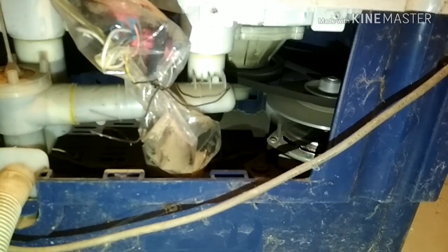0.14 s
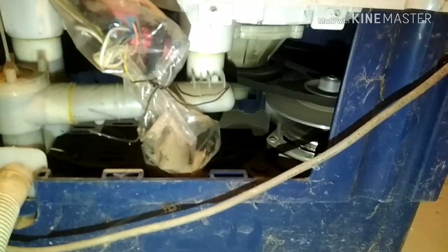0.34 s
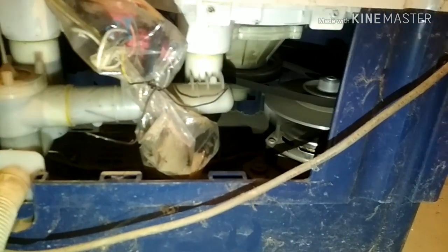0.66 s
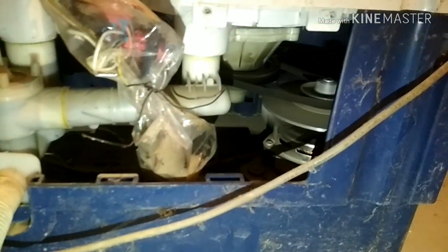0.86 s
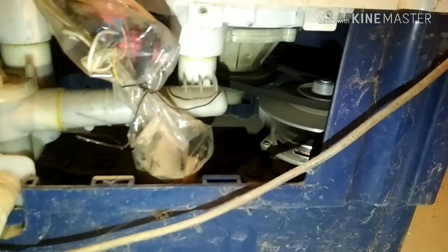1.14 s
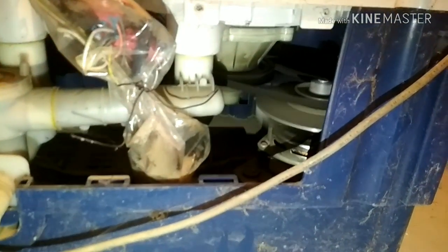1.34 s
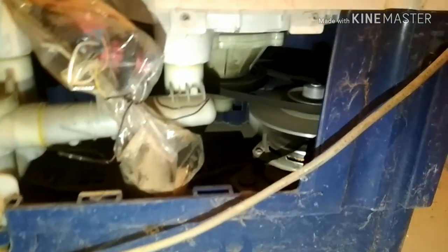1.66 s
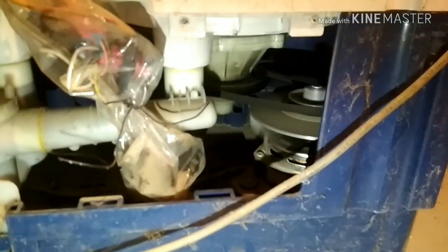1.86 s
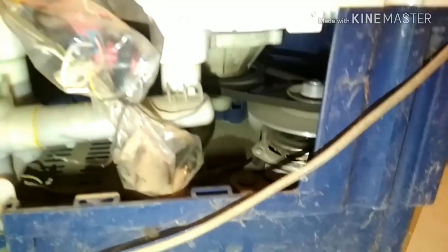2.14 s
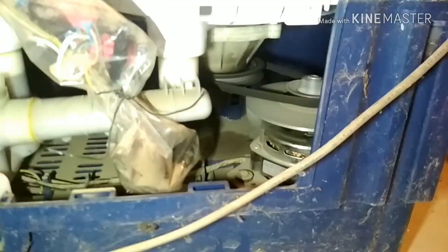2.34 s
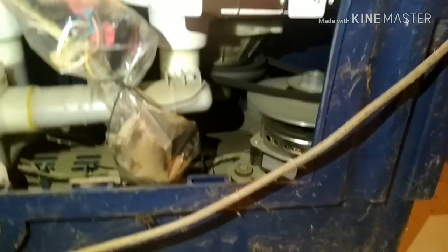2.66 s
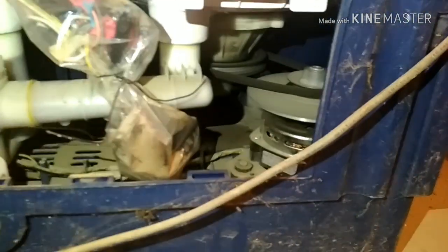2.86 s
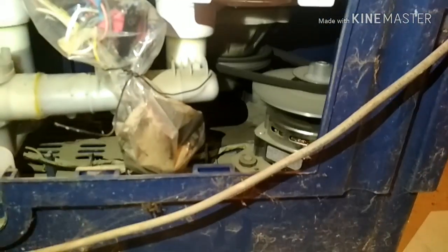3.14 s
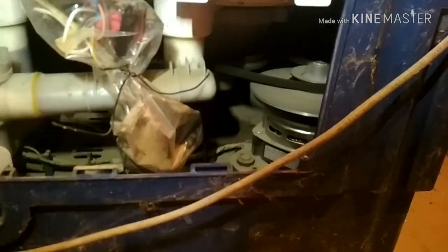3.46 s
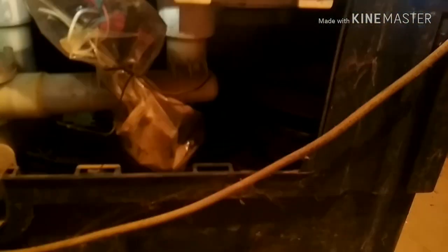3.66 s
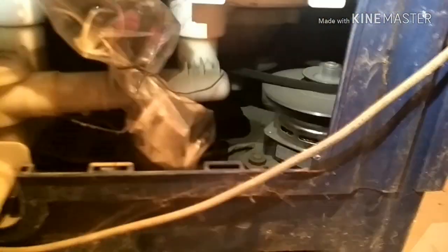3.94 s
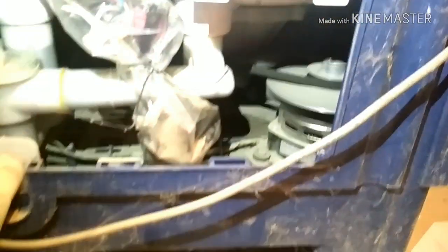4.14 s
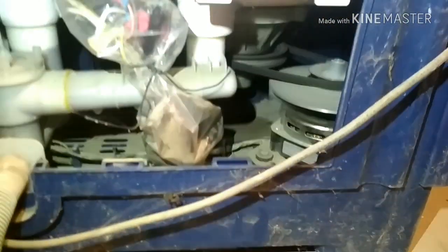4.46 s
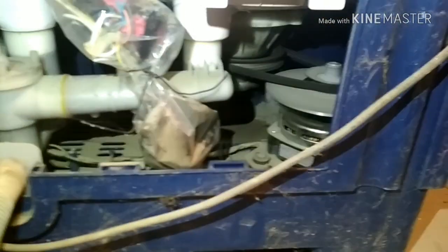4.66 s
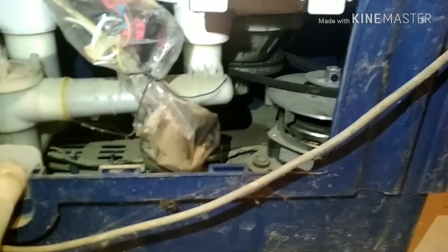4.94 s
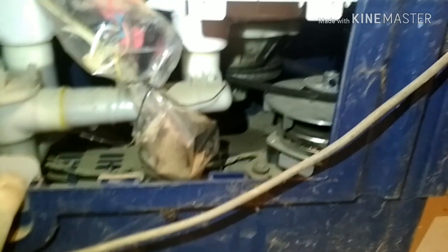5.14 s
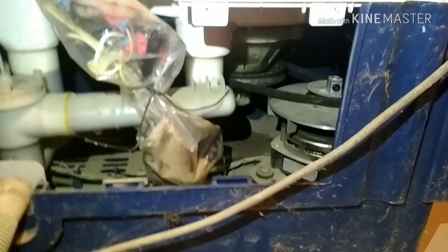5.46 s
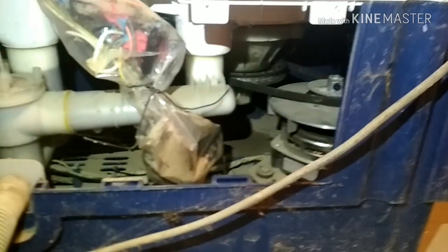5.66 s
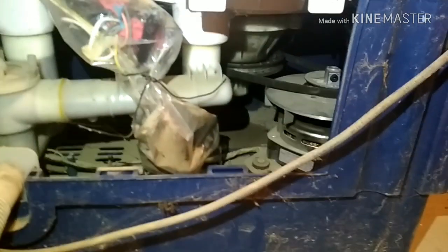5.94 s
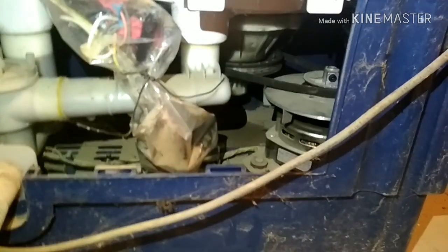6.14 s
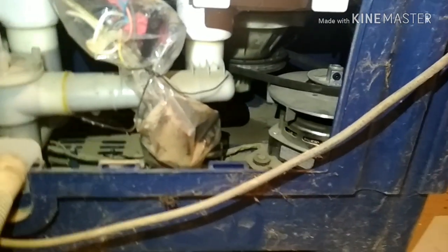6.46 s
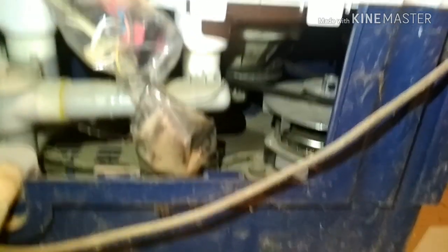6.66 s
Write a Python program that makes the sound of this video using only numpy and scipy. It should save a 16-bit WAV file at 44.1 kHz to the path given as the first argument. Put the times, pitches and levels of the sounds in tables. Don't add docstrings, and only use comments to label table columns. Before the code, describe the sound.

Close to an open washing machine, a strong low mains hum shakes the cabinet, with grinding gears, a hissing fan and a belt squeaking about twice a second. A plastic bag rustles and snaps early on. The power cuts halfway; the whirr slows and fades within about a second. Quiet follows, with nail ticks, finger creaks on the phone case, mostly left, and a faint distant engine.

```python
import sys
import numpy as np
from scipy import signal
from scipy.fft import rfft, irfft, next_fast_len
from scipy.io import wavfile
from scipy.ndimage import uniform_filter1d, map_coordinates

SR = 44100
rng = np.random.default_rng(int(sys.argv[2]) if len(sys.argv) > 2 else 0)


def digitize_waveform(pressure):
    field = np.atleast_2d(pressure).T
    bounded = np.clip(field, -1, 1)
    quanta = np.round(bounded * 32767).astype(np.int16)
    wavfile.write(sys.argv[1], SR, quanta)


def to_linear_factor(level_db):
    exponent = np.asarray(level_db, float) / 20
    return 10 ** exponent


N = 300320

# time in seconds, level in dB.
HUM_LEVEL = [(0.0, -8.5), (0.23, -12), (0.39, -15), (0.55, -11), (0.81, -14.5), (1.26, -9), (1.83, -14),
             (2.04, -11.5), (2.15, -14), (2.29, -12), (2.47, -16.5), (2.59, -17), (2.63, -13), (2.93, -11),
             (2.98, -9), (3.14, -10), (3.57, -9.5)]
# multiple of the hum, left level in dB, right level in dB.
IRON_BUZZ = [(2, -29.5, -33), (3, -37.5, -37), (4, -42, -40), (5, -43.5, -43.5), (6, -52, -47),
             (7, -47.5, -57.5), (8, -55.5, -53), (9, -49.5, -51), (10, -57.5, -51), (11, -52.5, -49)]
# pitch in Hz, width in Hz, level in dB.
CABINET_MODES = [(85.2, 9.9, -1), (115.7, 9, -3), (128.8, 14, -2.5), (169, 34, -9), (55.6, 40, -24),
                 (223, 79, -19.5)]
# pitch in Hz, width in Hz, level in dB.
FRAME_MODES = [(223, 40, -20.5), (269.4, 9, 0.5), (344, 47, -7.5), (371, 30, -5), (416.2, 31, -9.5),
               (506.4, 63.5, -12.5), (725, 286, -18)]
# pitch in Hz, width in Hz, level in dB.
PULLEY_MODES = [(826, 293, -3), (1190, 243, 0.5), (1409, 150, 2.5), (1585, 168, 0), (2190, 660, -10.5)]
# pitch in Hz, width in Hz, level in dB.
BEARING_MODES = [(1430, 130, 0), (1230, 70, 0)]
# start in seconds, length in seconds, level in dB.
BEARING_SPELLS = [
    (4.25, .12, -71),
    (4.552, 0.5, -71.5),
]
# frequency in Hz, level in dB per Hz.
FAN_COLOUR = [(1500, -34.5), (2500, -1), (3500, -6.5), (4500, -11.5), (6000, -2), (9000, -6), (11200, -1.5),
              (13000, -14.5), (15300, -31)]
# start in seconds, length in seconds, dB over the fan.
BAG_FLUTTER = [(0.02, 1.0, -3), (3.12, 0.31, -8)]
# time in seconds, share of full speed.
ROTOR_SPEED = [(3.6, 1), (3.75, 0.83), (3.85, 0.84), (4.0, .72), (4.24, 0.61), (4.32, 0.51), (4.45, 0.46),
               (4.55, 0.28), (4.75, .13), (4.9, .02)]

# time in seconds, peak in dB, left-right difference in dB.
BAG_FOLDS = [(0.0844, -30.5, -0.5), (0.1499, -39.5, -5.5), (0.2696, -24.5, -5), (0.2867, -38.5, -7.5),
             (0.4657, -39, -11.5), (0.6376, -42, -9), (0.7189, -45, -2.5), (0.8312, -30.5, -3.5),
             (3.2387, -43.5, 2.5), (3.4278, -36.5, -4)]
# time in seconds, peak in dB, left-right difference in dB.
BAG_SNAPS = [
    (0.502, -43, -2),
    (0.9266, -20, -0.5),
    (3.1328, -41, -2.5),
]
# time in seconds, peak in dB, left-right difference in dB.
BAG_SLIDES = [(4.2394, -45.5, -9.5), (5.675, -51, 14), (5.697, -40, 16.5)]
# time in seconds, peak in dB, left-right difference in dB.
NAIL_TICKS = [(4.9962, -37.5, 6.5)]
# time in seconds, peak in dB, left-right difference in dB.
NAIL_TAPS = [(4.5878, -61.5, 10), (4.5915, -60, -5), (4.8634, -58.5, 9)]
# frequency in Hz, level in dB per Hz.
FILM_BRIGHT = [(4500, -30.5), (6500, -13), (8500, -2), (11000, 0), (13500, -6.5), (15500, -14.5)]
# frequency in Hz, level in dB per Hz.
FILM_DULL = [(900, -21.5), (1900, 2), (3000, 1.5), (4600, -0.5), (6500, -3.5), (9000, -33)]

# time in seconds, peak in dB, case pitch in Hz, left-right difference in dB.
FINGER_SLIPS = [(4.592, -53, 880, 12), (4.863, -48, 1270, 23.5), (4.995, -51, 1300, 20),
                (5.01, -53, 910, 12), (5.024, -56, 719, 16), (5.045, -59, 610, 22), (5.068, -51.5, 835, 16),
                (5.098, -57, 634, 17), (5.14, -59, 350, 14), (5.181, -58, 812, 12.5),
                (5.198, -57.5, 1000, 17), (5.227, -67, 816, 9), (5.247, -55.5, 682, 25),
                (5.349, -61, 690, 16), (5.387, -61, 390, 17), (5.417, -64, 397, 21), (5.44, -68, 390, 18),
                (5.458, -62, 383, 23), (5.495, -67.5, 370, 18), (5.514, -69, 370, 18),
                (5.534, -66, 406, 19), (5.554, -57, 1640, 12.5), (5.618, -60, 385, 10),
                (5.788, -66.5, 1230, 0.5), (5.936, -61, 1400, -8), (6.014, -59.5, 1400, -4.5),
                (6.106, -67, 404, 14.5), (6.173, -59, 557, 23), (6.305, -56, 1230, 4.5),
                (6.524, -62.5, 1650, 5.5)]
# start in seconds, length in seconds, tremor in dB, scrape in dB.
HAND_TOUCHES = [(4.863, 0.02, -50.5, -65), (4.999, 0.097, -53, -57.5), (5.139, 0.13, -59.5, -66.5),
                (5.304, 0.11, -64.5, -77), (5.423, 0.11, -67, -81), (5.756, .03, -70, -90.5),
                (6.125, .05, -67, -74), (6.177, .03, -85, -68), (6.497, 0.089, -75, -80)]
# frequency in Hz, level in dB per Hz.
TREMOR_COLOUR = [(25, -8), (70, 3), (110, 8), (170, 6.5), (220, -5.5), (300, -21), (500, -46.5)]
# pitch in Hz, width in Hz, level in dB.
CASE_MODES = [(387, 43, -4), (634, 140, -1.5), (890, 370, -2.5)]

# time in seconds, firings per second.
ENGINE_PACE = [(0.0, 26.08), (0.5, 28.58), (1.7, 28.48), (2.2, 30.39), (2.7, 28.25), (3.3, 30.16),
               (3.6, 24.54), (4.0, 26.06), (4.45, 22.86), (5.1, 27.05), (5.55, 24.59), (6.2, 28.17),
               (6.81, 26.33)]
# time in seconds, level in dB.
ENGINE_LEVEL = [(3.6, -61.5), (4.51, -65.5), (4.73, -65), (5.2, -63), (5.48, -66.5), (6.08, -64),
                (6.46, -67), (6.81, -63.5)]
# frequency in Hz, level in dB per Hz.
ENGINE_COLOUR = [(600, -30), (1200, -3), (1600, -4), (2900, 0), (5200, -1), (7500, 0.5), (11400, -2.5),
                 (13000, -7.5), (14500, -15.5), (15400, -18)]
# frequency in Hz, level in dB per Hz.
ROOM_COLOUR = [(120, -28), (200, -8), (997, -12), (1370, -8), (1520, -8), (1640, -6), (2500, -6),
               (3250, -28.5), (5500, -120)]
# pitch in Hz, width in Hz, level in dB.
WALL_MODES = [(100, 9, 0), (46.06, 30, -7)]
# time in seconds, level in dB.
HOUSE_LEVEL = [(5.6, -76.5), (5.8, -68.5), (6.0, -74.5), (6.13, -63.5), (6.81, -68)]

# frequency in Hz, likeness from 0 to 1.
EAR_LIKENESS = [(60, 1), (130, 0.98), (290, .93), (640, 1), (1400, 0.61), (3000, 0.098), (7000, 0.15),
                (15000, 0.094)]
# frequency in Hz, left-right difference in dB.
MACHINE_LEAN = [(60, -6), (110, 0), (200, -3), (380, -1.5), (690, -1.5), (1280, 1.5), (2360, 2),
                (4350, 2.5), (8030, 6), (14800, -26.5)]
# frequency in Hz, lead in radians.
LEFT_LEAD = [(0, 3), (1030, -1.3), (1890, -1.5), (3010, -2.5), (6370, -16), (8610, -13), (12900, -26),
             (15000, -21.5)]
# frequency in Hz, left-right difference in dB.
FAR_LEAN = [(60, 5), (240, 3.5), (940, 0), (3740, 5.5), (14800, -1.5)]

HUM_HZ, PANEL_HZ = 99.87, 94.1
OFF_S = 3.591
PANEL_T60_S, WINDING_T60_S = 0.48, 0.14
JOG, SHAKE, GEAR, RUB, BLOW = (-27.5, 2.43), (-32.5, 2.37), (-31.5, 4.94), (-45, 3.92), (-52.5, 2.9)
FOLD = dict(dull_db=-6, rise=0.0087, t60=0.14, crack=0)
SNAP = dict(dull_db=3, rise=0.0002, t60=0.066, crack=3.6)
SLIDE = dict(dull_db=-31, rise=0.011, t60=0.1, crack=0)
TICK = dict(dull_db=-3, rise=0.000298, t60=0.01, crack=1.51)
TAP = dict(dull_db=12.5, rise=0.00041, t60=0.017, crack=1.39)


def hum():
    t = np.arange(N) / SR
    phase = 2 * np.pi * HUM_HZ * t - 0.4
    free = np.clip((t - 3.6) / 0.15, 0, 1)
    sag = 2 * np.pi * np.cumsum(free * (PANEL_HZ - HUM_HZ)) / SR
    jitter = free * 1.1 * wobble(16)
    driven = to_linear_factor(curves(HUM_LEVEL)[0]) * dying(PANEL_T60_S)
    jogged = free * spun(*JOG) * to_linear_factor(2.36 * wobble(21.99))
    out = np.sqrt(2) * (driven + jogged) * np.cos(phase + sag + jitter) * pan(-0.3)[:, None]
    current = dying(WINDING_T60_S)
    for k, left_db, right_db in IRON_BUZZ:
        ahead = 0.045 * k * np.array([[-1], [1]])
        drift = rng.uniform(0, 2 * np.pi) + 0.07 * k * wobble(10)
        size = np.sqrt(2) * current * to_linear_factor((0.9 + 0.17 * k) * wobble(7.054))
        out += to_linear_factor([[left_db], [right_db]]) * size * np.cos(k * phase + ahead + drift)
    return out


def cabinet():
    return spun(*SHAKE) * to_linear_factor(4.5 + 0.79 * wobble(2.5)) * rush(modes(CABINET_MODES))


def gears():
    gate = (1 + 0.37 * torque()) * to_linear_factor(1.2 * wobble(25))
    return spun(*GEAR) * to_linear_factor(0.12 * belt_grab_db() - 2) * rush(modes(FRAME_MODES), gate)


def belt():
    def rubbing(hz):
        return modes(PULLEY_MODES)(hz) * hz / (hz + 600) / (1 + (hz / 2800) ** 4)

    grab_db = belt_grab_db()
    gate = (1 + 0.18 * torque()) * to_linear_factor(1.6 * wobble(30.15))
    rub = to_linear_factor(0.61 * grab_db + 5.5) * rush(rubbing, gate)
    squeal = (to_linear_factor(grab_db) - 1) * to_linear_factor(1.5) * rush(modes(PULLEY_MODES[2:4]))
    return spun(*RUB) * (rub + squeal)


def bearing():
    out = np.zeros((2, N))
    for spell, note in zip(BEARING_SPELLS, BEARING_MODES):
        out += spells([spell], rise=0.16, t60=0.8) * rush(modes([note]), to_linear_factor(2.5 * wobble(20)))
    return out


def fan():
    flutter = 1 + spells(BAG_FLUTTER, rise=0.05, t60=0.34) * to_linear_factor(0.83 * wobble(18))
    return spun(*BLOW) * flutter * to_linear_factor(1.6 * wobble(36)) * rush(colour(FAN_COLOUR))


def bag():
    bursts = crackle(BAG_FOLDS, **FOLD) + to_linear_factor(-8) * crackle(BAG_SNAPS, **SNAP)
    bursts += crackle(BAG_SLIDES, **SLIDE)
    bursts += crackle(NAIL_TICKS, **TICK) + crackle(NAIL_TAPS, **TAP)
    bright, dull = bursts
    grains = to_linear_factor(2 * wobble(900))
    film = bright * rush(colour(FILM_BRIGHT), grains, FAR_LEAN)
    return film + dull * rush(colour(FILM_DULL), grains, FAR_LEAN)


def finger_slips():
    out, t = np.zeros((2, N + SR)), np.arange(SR // 10) / SR
    for s, db, hz, pan_db in FINGER_SLIPS:
        turn = 2 * np.pi * hz * t
        knock = to_linear_factor(3 - 60 * t * hz / 5) * np.sin(turn)
        tick = 0.6 * to_linear_factor(-60 * t / 0.002) * np.sin(2.3 * turn)
        unsteady = np.cumsum(rng.normal(0, 0.05, len(t)))
        after = 0.54 * to_linear_factor(-60 * t * hz / 32) * np.sin(turn + unsteady)
        push = to_linear_factor(-60 * t / 0.06) * (1 - np.exp(-t / 0.002))
        thud = -to_linear_factor(-11) * push * np.sin(2 * np.pi * 130 * t)
        start = round((s + 0.002) * SR)
        out[:, start:start + len(t)] += to_linear_factor(db) * pan(pan_db)[:, None] * (knock + after + thud + tick)
    return out[:, :N]


def hand():
    touches = np.array(HAND_TOUCHES)
    shaky = spells(touches[:, [0, 1, 2]], rise=0.0078, t60=0.36)
    rubbing = spells(touches[:, [0, 1, 3]], rise=0.0078, t60=0.36)
    tremor = shaky * to_linear_factor(-6.5) * rush(colour(TREMOR_COLOUR), to_linear_factor(2.5 * wobble(25)), FAR_LEAN)
    scrape = rubbing * to_linear_factor(-8.5) * rush(modes(CASE_MODES), to_linear_factor(2.1 * wobble(42)), FAR_LEAN)
    return pan(20)[:, None] * (tremor + scrape)


def engine():
    firings = np.cumsum(curves(ENGINE_PACE)[0]) / SR + 0.22
    cycle = firings - 0.03 * np.cos(np.pi * (firings - 0.3))
    since = cycle % 1
    size = to_linear_factor(1.3 * rng.standard_normal(256))[cycle.astype(int)]
    gate = 0.2 + size * (1 - np.exp(-since / 0.05)) * to_linear_factor(-26 * since)
    return to_linear_factor(curves(ENGINE_LEVEL)[0] + 8) * rush(colour(ENGINE_COLOUR), gate, FAR_LEAN)


def room():
    tone = to_linear_factor(-3) * np.cos(2 * np.pi * HUM_HZ * np.arange(N) / SR + wobble(3))
    rumble = to_linear_factor(-2.5) * rush(modes(WALL_MODES), lean=FAR_LEAN)
    walls = to_linear_factor(curves(HOUSE_LEVEL)[0] + 1.2 * wobble(7)) * (rumble + tone)
    return to_linear_factor(-74.5) * rush(colour(ROOM_COLOUR), lean=FAR_LEAN) + walls


def speed():
    return np.clip(curves(ROTOR_SPEED)[0], 0, 1)


def spun(db, power):
    return to_linear_factor(db) * speed() ** power


def dying(t60):
    return to_linear_factor(-60 * np.clip(np.arange(N) / SR - OFF_S, 0, None) / t60)


def torque():
    return np.cos(2 * np.pi * HUM_HZ * np.arange(N) / SR) * dying(WINDING_T60_S)


def belt_grab_db():
    lap_s, joint_s, kink_lap = 0.518, 0.135, 0.6
    laps = np.cumsum(speed()) / SR / lap_s - joint_s / lap_s

    def passing(place):
        away = (laps - place + 0.5) % 1 - 0.5
        return np.exp(-0.5 * (away / 0.08) ** 2)

    return (6 * passing(0) + 1.8 * passing(kink_lap)) / np.clip(speed(), 0.5, 1) ** 2.2


def crackle(events, dull_db, rise, t60, crack):
    age, bright = np.arange(SR // 2) / SR, np.zeros((2, N + SR))
    fall = to_linear_factor(-60 * age / t60) + crack * to_linear_factor(-60 * age / 0.007)
    burst = (1 - np.exp(-age / max(rise, 1e-4))) * fall
    for s, db, pan_db in events:
        start = round((s + 0.00068) * SR)
        bright[:, start:start + len(age)] += pan(pan_db)[:, None] * to_linear_factor(db - 5.5) * burst
    return np.array([bright[:, :N], to_linear_factor(dull_db) * bright[:, :N]])


def spells(rows, rise, t60):
    t, gain = np.arange(N) / SR, np.zeros(N)
    for s, length, db in rows:
        fall_db = 60 * np.clip(t - s - length, 0, None) / t60
        gain += to_linear_factor(db - fall_db) * np.clip((t - s) / rise + 1, 0, 1)
    return gain


def rush(response, gate=1, lean=MACHINE_LEAN):
    m = next_fast_len(N + 8192)
    hz = np.fft.rfftfreq(m, 1 / SR)
    turn = np.arccos(np.clip(along(EAR_LIKENESS, hz), -1, 1)) / 2
    noise = rfft(gate * rng.standard_normal((2, N)), m) * response(hz)
    mid, side = noise * [np.cos(turn), np.sin(turn)]
    ears = pan(along(lean, hz)) * np.exp(np.outer([0.5j, -0.5j], along(LEFT_LEAD, hz)))
    return unit(irfft(ears * [mid + side, mid - side], m)[:, :N])


def modes(table):
    def response(f):
        total = 0
        for k, (c, w, db) in enumerate(table):
            total = total + (-1) ** k * to_linear_factor(db) * 1j * f * w / (c * c - f * f + 1j * f * w)
        return total
    return response


def colour(spectrum):
    return lambda hz: to_linear_factor(along(spectrum, hz))


def along(points, hz):
    f, v = np.transpose(points)
    return np.interp(np.log(hz + 1), np.log(f + 1), v)


def curves(rows):
    s, *cols = np.transpose(rows)
    return [np.interp(np.arange(N) / SR, s, c) for c in cols]


def wobble(rate):
    coarse = np.arange(0, N + 16, 16)
    knots = rng.standard_normal(int(N * rate / SR) + 4)
    return np.interp(np.arange(N), coarse, map_coordinates(knots, [coarse * rate / SR]))


def pan(db):
    return to_linear_factor(np.array([db / 2, -db / 2]))


def unit(x):
    return x / np.sqrt(np.mean(x ** 2) + 1e-20)


def suppress(x, share, floor_db):
    hz, _, z = signal.stft(x, SR, nperseg=1024)
    now = abs(uniform_filter1d(abs(z) ** 2, size=7, axis=2)) + 1e-20
    slow = uniform_filter1d(np.log(now), size=30, axis=2)
    steady = np.exp(uniform_filter1d(slow, size=9, axis=1))
    gain = np.maximum(1 - share * steady / now, to_linear_factor(floor_db))
    gain[now < 0.42 * steady] = to_linear_factor(-20)
    gain[:, hz < 700] = 1
    return signal.istft(z * gain, SR, nperseg=1024)[1][:, :N]


def gain_ripple(x):
    ripple = np.cos(2 * np.pi * 100 * np.arange(N) / SR + 2.74)
    return 0.13 * uniform_filter1d(x * ripple, size=2208, axis=1)


def scene():
    machine = hum() + cabinet() + gears() + belt() + bearing() + fan()
    return machine + bag() + finger_slips() + hand() + engine() + room()


def roll_off(x):
    return signal.sosfilt(signal.butter(12, 15300, fs=SR, output="sos"), x)


def record(dry):
    mix = suppress(dry, share=0.33, floor_db=-18) + gain_ripple(dry)
    return roll_off(mix)


dry = scene()
out = record(dry)
digitize_waveform(out)
```